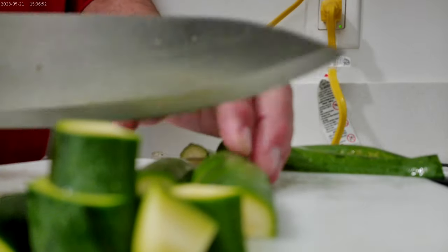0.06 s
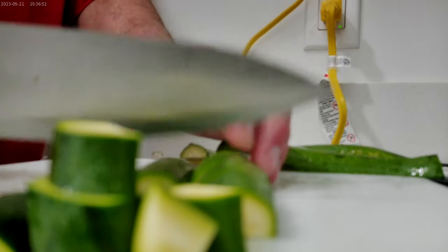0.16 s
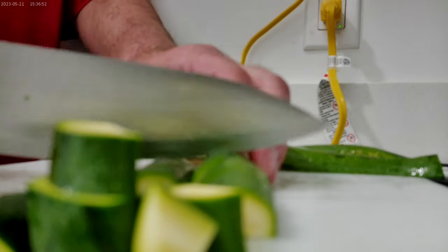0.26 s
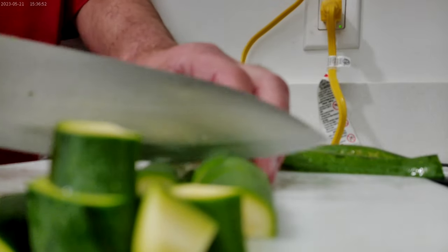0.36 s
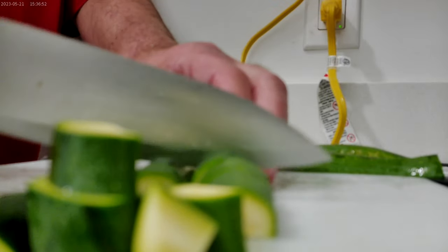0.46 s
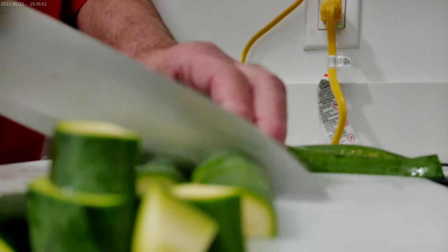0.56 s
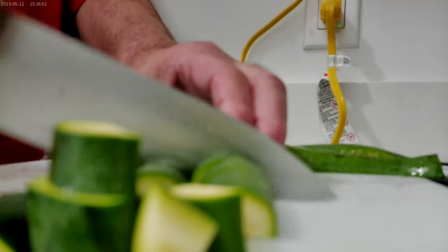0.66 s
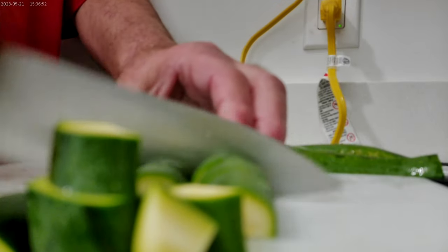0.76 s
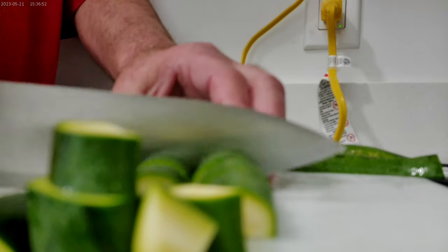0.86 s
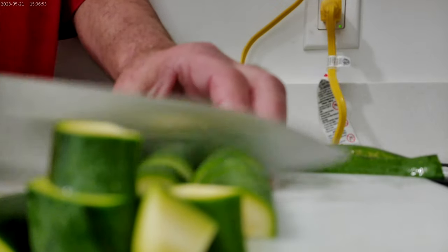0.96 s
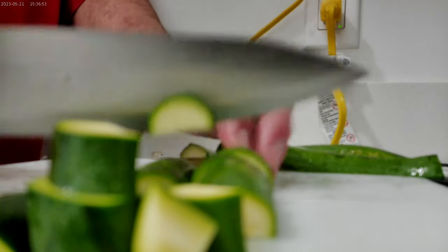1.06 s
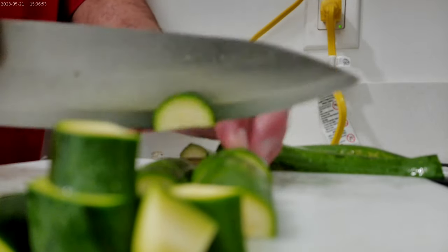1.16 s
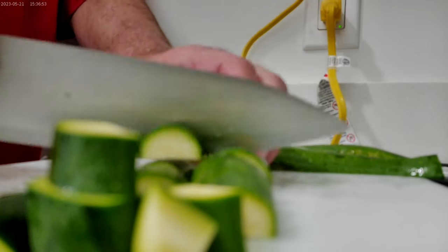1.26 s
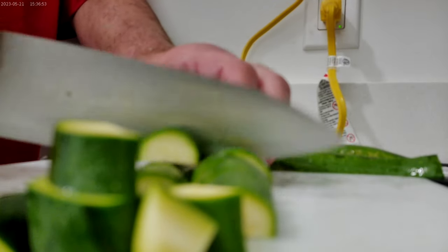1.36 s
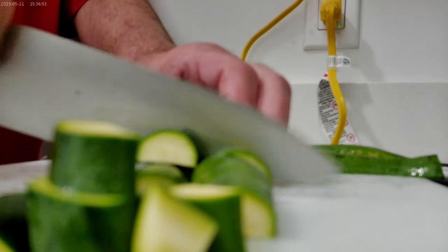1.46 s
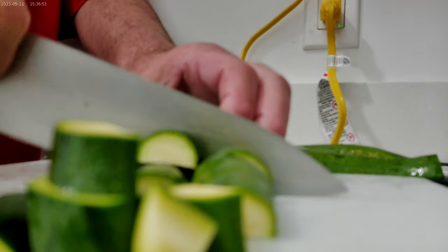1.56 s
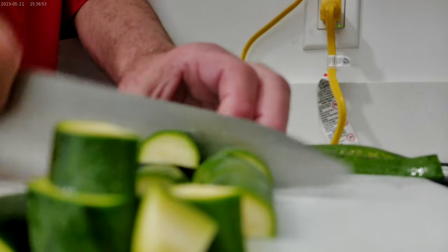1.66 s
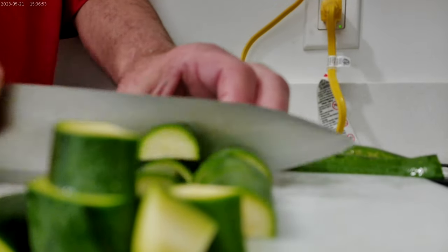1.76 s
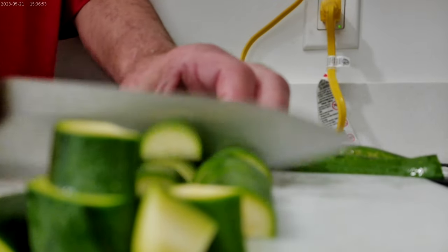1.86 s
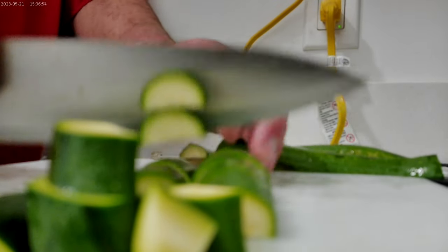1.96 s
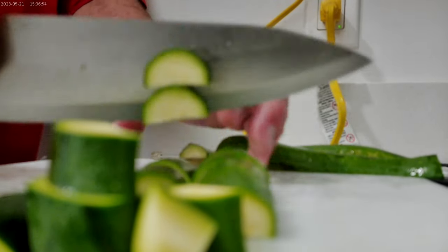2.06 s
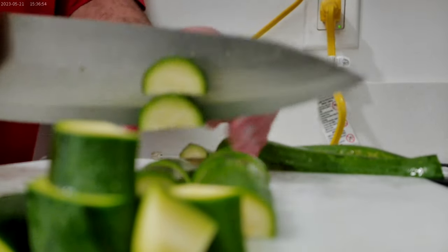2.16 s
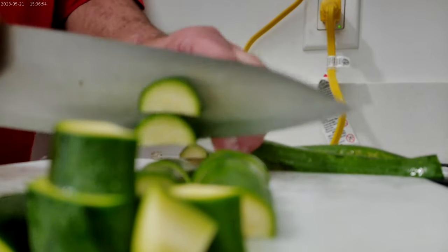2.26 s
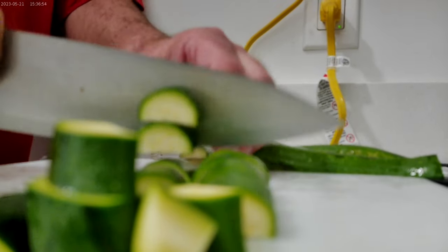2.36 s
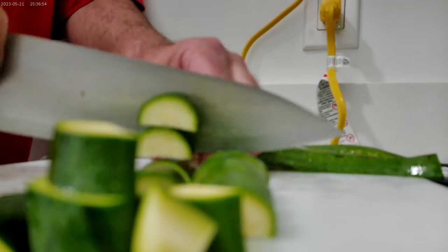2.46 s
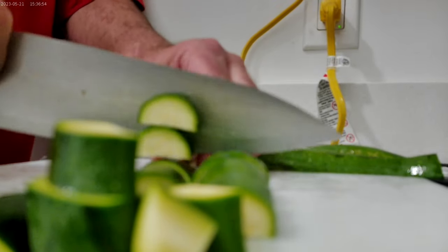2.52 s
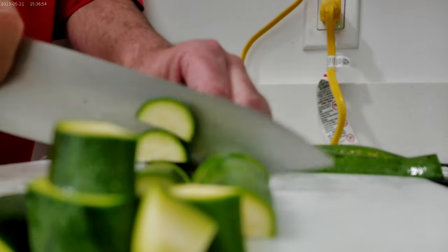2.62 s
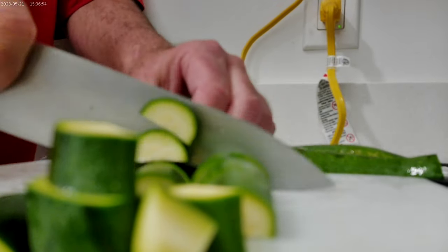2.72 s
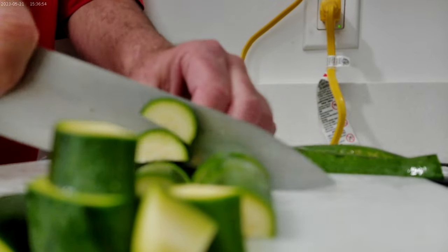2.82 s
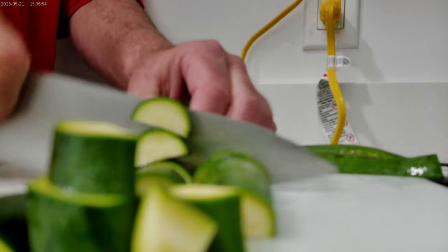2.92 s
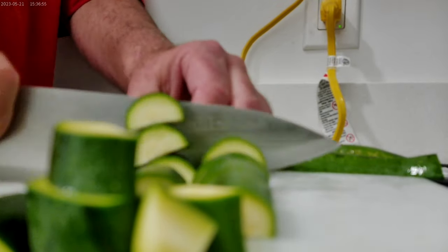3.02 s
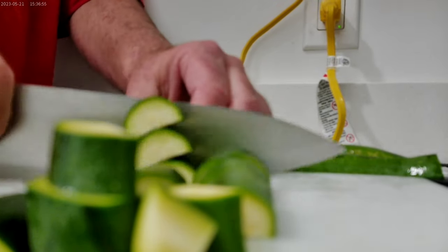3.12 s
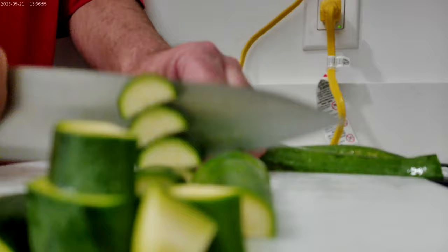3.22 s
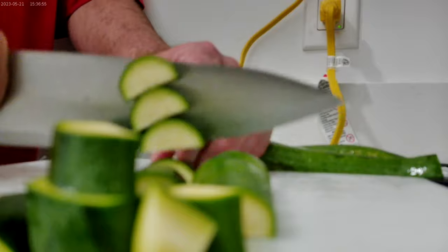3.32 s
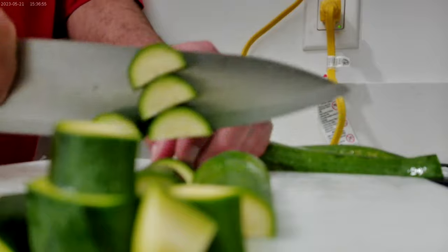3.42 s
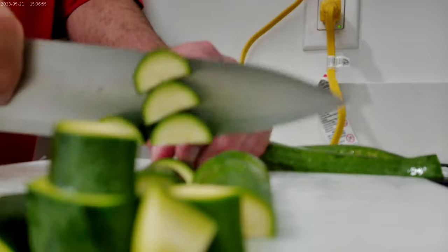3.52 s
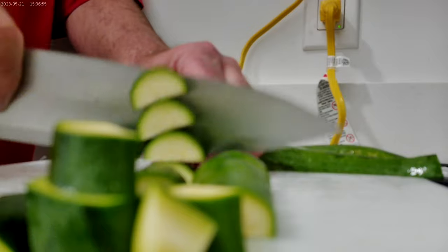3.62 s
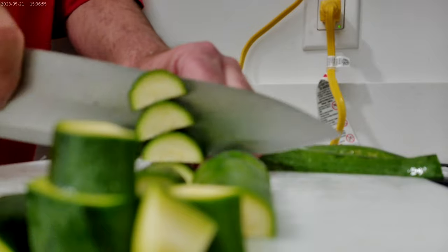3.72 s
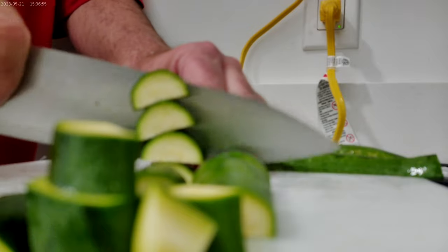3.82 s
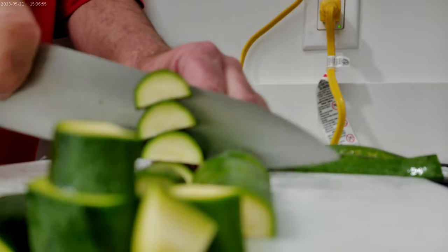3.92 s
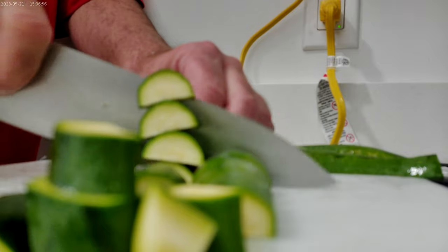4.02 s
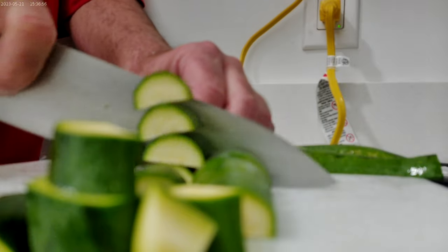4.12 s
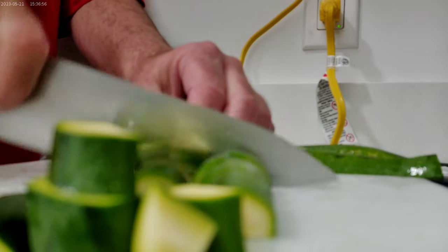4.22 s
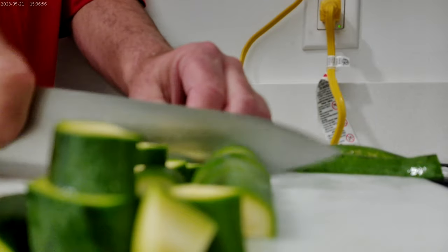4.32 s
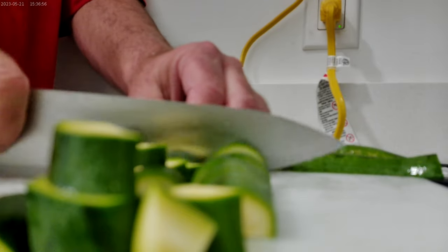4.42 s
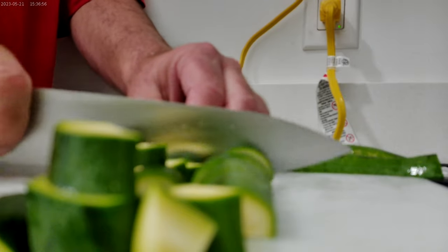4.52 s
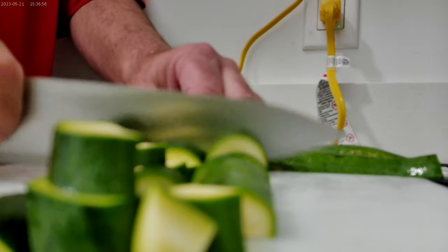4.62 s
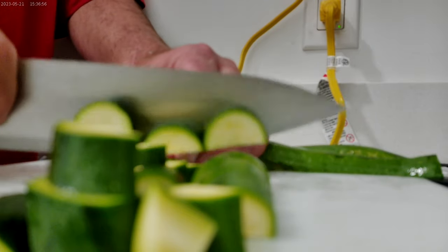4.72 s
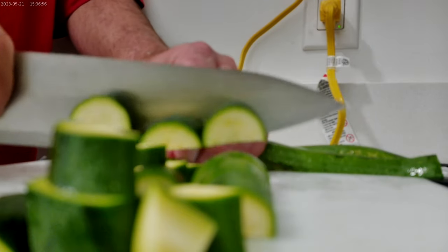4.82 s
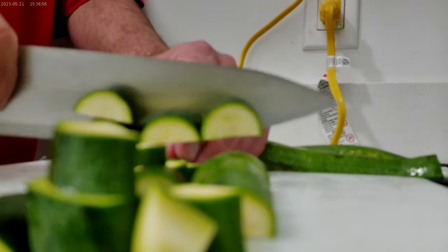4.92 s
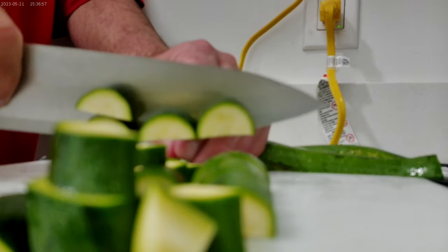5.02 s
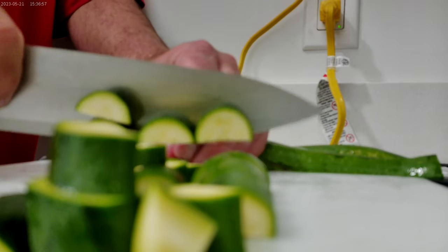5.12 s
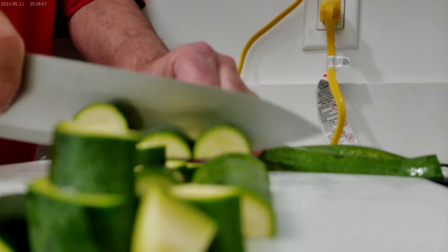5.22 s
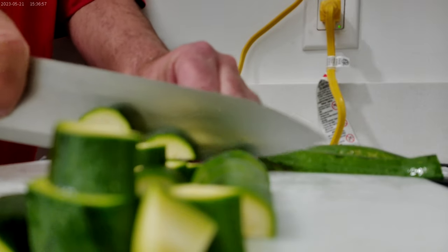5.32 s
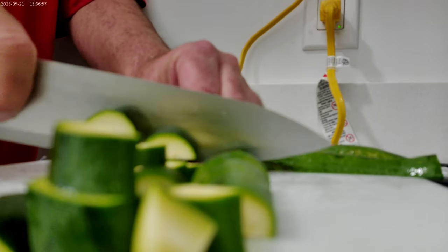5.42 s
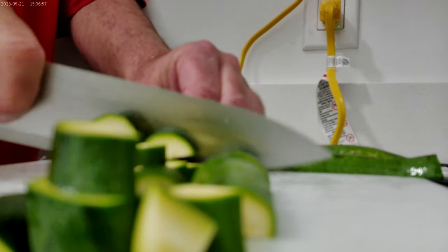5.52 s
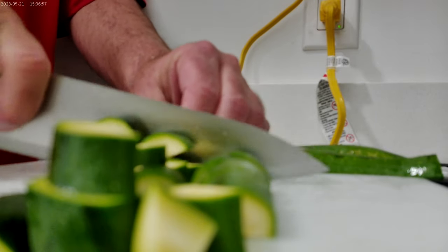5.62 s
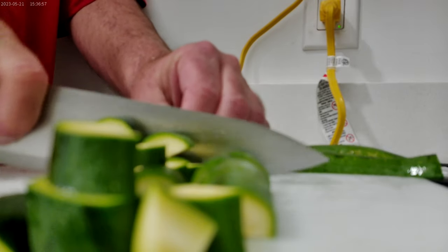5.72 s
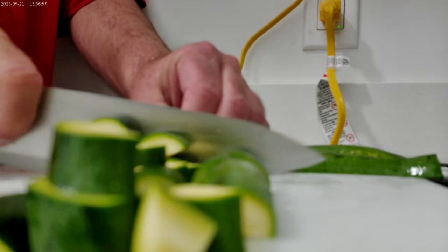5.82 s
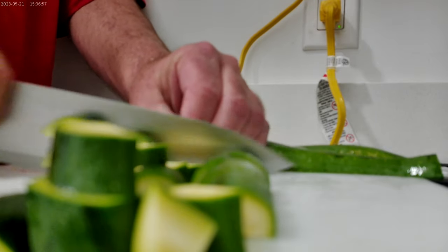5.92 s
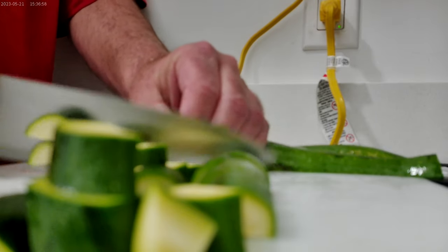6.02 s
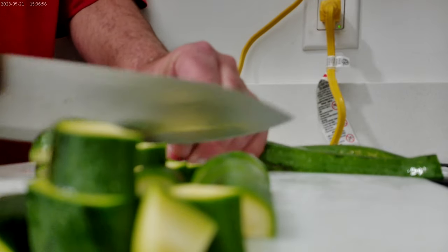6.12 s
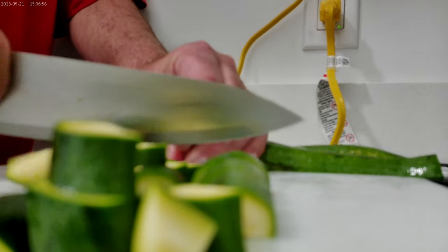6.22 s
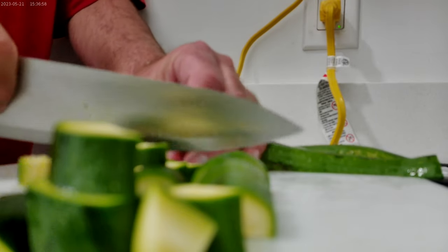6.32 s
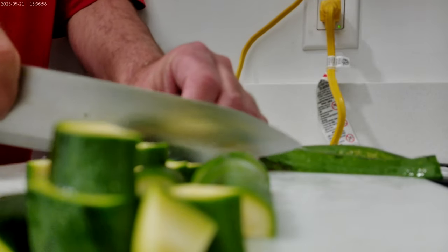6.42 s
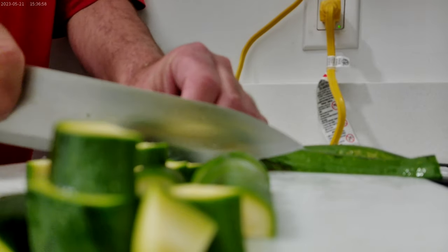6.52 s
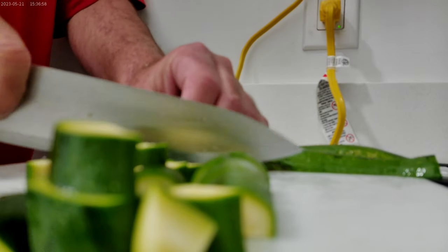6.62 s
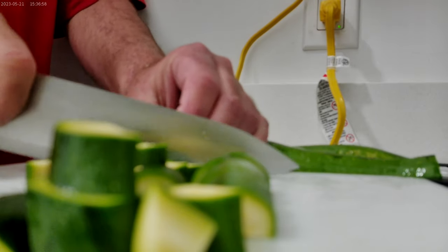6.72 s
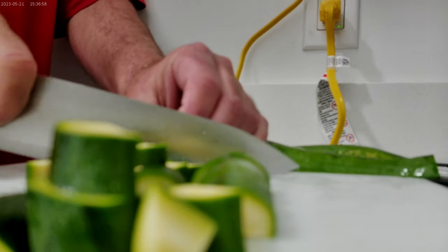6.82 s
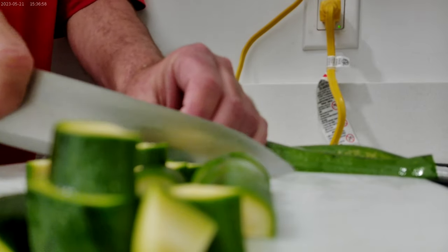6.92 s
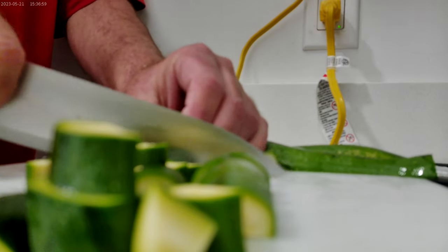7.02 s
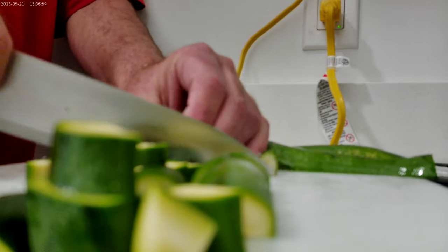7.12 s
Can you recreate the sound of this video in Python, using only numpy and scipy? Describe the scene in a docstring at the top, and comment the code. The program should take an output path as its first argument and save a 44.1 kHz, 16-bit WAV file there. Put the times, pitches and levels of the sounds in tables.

```python
"""A small kitchen, a microphone close to the cutting board: a large knife slices zucchini.
Six cuts crunch through the flesh as rough noise growing with depth; each ends in a knock of ringing board modes.
After five of them the blade is drawn back: rubbing noise and a chattering blade resonance.
Short damped modes make the soft touches of blade and slices in between; rubbing noise makes light slides.
Decaying noise gives the room, the knocks overload the microphone, and an appliance hums faintly (sines)."""
import sys
import numpy as np
from scipy import signal
from scipy.fft import rfft, irfft, next_fast_len
from scipy.io import wavfile

SR = 44100
rng = np.random.default_rng(int(sys.argv[2]) if len(sys.argv) > 2 else 0)


def dump(signal):
    """Clip the signal to [-1, 1] and save it as 16-bit WAV at the path in sys.argv[1]."""
    limited = np.clip(np.atleast_2d(signal).T, -1, 1)
    pcm = np.round(limited * 32767).astype(np.int16)
    wavfile.write(sys.argv[1], SR, pcm)


N = 316197
TIME = np.arange(N) / SR
RING_TIME = np.arange(SR // 3) / SR  # time axis of one short sound, s
THUD_T60 = 0.15  # s
GRIP_S = 0.008  # time for the blade to take hold or let go


def amp(db):
    """Decibels to gain."""
    return 10 ** (np.asarray(db) / 20)


def fall(seconds, t60):
    """Exponential decay that loses 60 dB in t60 seconds."""
    return np.exp(-np.log(1000) * seconds / t60)


def unit(x):
    """Scales to an rms of 1."""
    return x / np.sqrt(np.mean(x ** 2) + 1e-20)


def read(points, hz):
    """Reads a table on a log-frequency axis."""
    f, value = np.transpose(points)
    return np.interp(np.log(hz + 1), np.log(f + 1), value)


def add(mix, s, sound):
    """Mixes a sound in at time s."""
    part = mix[max(round(s * SR), 0):][:len(sound)]
    part += sound[:len(part)]


def colour(x, points, size=4096):
    """Causal minimum-phase filter with the given spectrum."""
    log_gain = np.log(amp(read(points, abs(np.fft.fftfreq(size, 1 / SR)))))
    minimum_phase = np.exp(np.conj(signal.hilbert(log_gain)))
    impulse = np.fft.ifft(minimum_phase).real
    return signal.oaconvolve(x, impulse[:size // 2])[:len(x)]


def resonate(x, hz, width):
    """A resonance with a gain of 1 at its peak."""
    return signal.lfilter(*signal.iirpeak(hz, hz / width, SR), x)


def ring(modes, weights):
    """Dying sines, each mode weighted by how the blow excites it."""
    hz, db, t60 = np.transpose(modes)[:, :, None]
    sines = np.sin(2 * np.pi * hz * RING_TIME)
    return (weights[:, None] * amp(db) * fall(RING_TIME, t60) * sines).sum(0)


def puff(points, t60):
    """A coloured burst of noise that starts at about rms 1 and dies away."""
    decay = fall(RING_TIME, t60)
    burst = colour(rng.standard_normal(len(decay)) * decay, points)
    return unit(burst) * np.sqrt(np.mean(decay ** 2))


def soften(x, seconds):
    """A contact of finite length rounds off the treble."""
    r = np.exp(-2 * np.pi / (SR * max(seconds, 1e-5)))
    return signal.lfilter([(1 - r) ** 2], [1, -2 * r, r * r], x)


def radiate(x, hz):
    """A small object gives off little bass."""
    return signal.sosfilt(signal.butter(3, hz, "high", fs=SR, output="sos"), x)


def muffle(x, hz):
    """Moist flesh soaks up the treble."""
    return signal.sosfilt(signal.butter(4, hz, fs=SR, output="sos"), x)


def touching(start, stop):
    """1 while the blade is in contact, with a short ramp at each end."""
    return np.clip(np.minimum(TIME - start, stop - TIME) / GRIP_S + 1 / 2, 0, 1)


# The edge hits the board: [t/s, force level/dB, contact time/ms, place along the board 0-1,
# knock centre f/Hz, level sent to the room/dB before the room's own level, counter thump level/dB]
CHOPS = [(0.7886, 0.5, 0.46, .30, 610, -5, -31), (1.6985, 2.5, 0.18, 0.3, 514, -2, -36),
         (2.9315, 2.5, 0.65, 0.76, 843, -5.5, -51.5), (4.2175, -2, 0.55, 0.3, 702.5, -7, -52.5),
         (5.7801, 3.5, 0.15, .68, 617, -5.5, -34), (6.9303, -1, 0.27, .8, 945.3, -3.5, -31)]
# Board with the knife on it: [f/Hz, relative level/dB, t60/s]
BOARD_MODES = [(330, -7.5, 0.038), (460, -12.5, 0.043), (535.9, -1, 0.024), (666, -5, 0.018),
               (712, -6.5, 0.026), (789, 3, 0.037), (947, -5, 0.034), (1123, -2.5, .02), (1250, -7, 0.021),
               (1517, -7, 0.044), (1990, -14, 0.017)]
# Crowd of weaker, tightly packed board modes, a spectrum: [f/Hz, relative level/dB]
BOARD_CROWD = [(150, -30.5), (280, -4), (600, 3), (950, -3), (1250, -2.5), (1600, -11.5), (2000, -14),
               (2600, -30), (3300, -26), (4300, -31), (6200, -39.5), (7500, -65)]
# Low thud of the counter, a spectrum: [f/Hz, relative level/dB]
THUD = [(15, -26.5), (30, -11), (55, -1.5), (85, -2), (125, -3), (190, -9), (300, -13), (500, -31.5),
        (1200, -71)]
# Wall and counter throw the knock back: [delay t/s, level/dB]
ECHOES = [(.0029, -9), (.0068, -23.5), (.0098, -18)]


def chops():
    """The tip lands, then the whole edge, and the board rings; returns the near sound and the room's feed."""
    near, far = np.zeros((2, N))
    lag = 0.0017  # s from tip to whole edge
    shape_db, focus_db, octaves = 2.5, 4, 0.45
    tip_db, crowd_db, steel_db = -10, -7, -53
    crowd_t60, steel_t60 = 0.04, 0.14  # s
    bass_hz, steel_hz = 235, 5570
    mode_hz = np.transpose(BOARD_MODES)[0]
    order = np.arange(len(BOARD_MODES)) + 1

    # the blade gives a faint, blurred ping
    ping = rng.standard_normal(len(RING_TIME))
    ping = resonate(resonate(ping, steel_hz, 300), steel_hz, 300)
    steel = amp(steel_db) * fall(RING_TIME, steel_t60) * unit(ping)

    for s, db, contact_ms, place, centre_hz, room_db, thump_db in CHOPS:
        # each mode is strong or weak according to where the edge lands
        weights_db = shape_db * np.cos(2 * np.pi * order * place)
        distance = np.log2(mode_hz / centre_hz) / octaves
        weights_db += focus_db * np.exp(-distance ** 2) - focus_db / 2
        modes = soften(ring(BOARD_MODES, amp(weights_db)), contact_ms / 1000)
        crowd = amp(crowd_db) * puff(BOARD_CROWD, crowd_t60)
        knock = amp(db) * radiate(modes + crowd, bass_hz)
        thump = amp(thump_db) * puff(THUD, THUD_T60)
        add(near, s, -amp(tip_db) * knock + thump + steel)
        add(near, s + lag, -knock)
        add(far, s + lag, amp(room_db) * knock + thump)
        for delay, echo_db in ECHOES:
            add(near, s + lag + delay, -amp(echo_db) * knock)
    return near, far


# The edge passes through the flesh, one row before each chop:
# [skin gives way t/s, crunch level/dB, rasp level/dB, growth on the way down/dB];
# levels are at full depth, before the snap of the bottom skin
CUTS = [(0.713, -39.5, -58.5, 11), (1.533, -41.5, -64.5, 15), (2.76, -41.5, -66.5, 5.5),
        (4.039, -38, -66, 16.5), (5.69, -29, -52, 32.5), (6.857, -41.5, -60.5, 9)]
# Wet hiss of the flesh as it parts, a spectrum: [f/Hz, relative level/dB]
FLESH = [(900, -26.5), (1750, 3.5), (2200, -3.5), (2700, -4.5), (3150, -2.5), (3500, -5.5), (4000, 1),
         (4600, -11.5), (5300, -19.5), (5900, -13), (6600, -28), (7500, -40)]


def cuts():
    """The crunch grows with the depth of the edge and ends when it meets the board."""
    crunch, rasp = np.zeros((2, N))
    rasp_growth = 1.45  # the rasp grows faster than the crunch
    snap_db, snap_s = 13, 0.011  # both surge as the bottom skin snaps
    for (start, crunch_db, rasp_db, growth_db), (stop, *_) in zip(CUTS, CHOPS):
        left_s = np.clip(stop - TIME, 0, stop - start)
        shallow_db = growth_db * left_s / (stop - start)
        push = touching(start, stop) * amp(snap_db * np.exp(-left_s / snap_s))
        crunch += push * amp(crunch_db - shallow_db)
        rasp += push * amp(rasp_db - rasp_growth * shallow_db)
    return rubbing(crunch, rasp, FLESH, grains_per_s=1400, spread_db=2.5, smooth=0.44, jerk_db=5.0)


# The blade is drawn back over the board: [start t/s, fastest t/s, t60 after that/s, scrape level/dB,
# rasp level/dB, chatter level/dB, chatter f/Hz when fastest, its rise before that/(Hz per s)]
DRAWS = [(0.868, .988, 0.14, -36, -52.5, -36.5, 801.7, 1200), (1.759, 1.872, 0.14, -35, -54, -47, 820, 0),
         (3.063, 3.15, 0.21, -40, -57.5, -39.5, 710, -300),
         (4.394, 4.493, 0.13, -36.5, -54.5, -32.5, 744, -400), (6.049, 6.149, 0.31, -55, -71, -61, 844, 0)]
# Hiss of the edge, a spectrum: [f/Hz, relative level/dB]
EDGE_HISS = [(900, -31), (1900, -0.5), (2500, -1.5), (3150, -2), (4000, -0.5), (4500, -9.5), (5300, -10),
             (5800, -7), (6400, -18.5), (7500, -34.5)]


def draws():
    """Each draw swells as the blade speeds up, then dies away as it lifts off the board."""
    scrape, rasp, judder = np.zeros((3, N))
    # as the blade gathers speed the scrape swells a little and the rasp a lot
    scrape_db_per_s, rasp_db_per_s = 20, 94.5
    bite_s = 0.025  # time for the edge to start rasping on the board
    for start, fastest, release_s, scrape_db, rasp_db, chatter_db, chatter_hz, rise in DRAWS:
        early_s = np.maximum(fastest - TIME, 0)
        late_s = np.maximum(TIME - fastest, 0)
        contact = touching(start, fastest + release_s) * fall(late_s, release_s)
        swell = contact * amp(-scrape_db_per_s * early_s)
        scrape += swell * amp(scrape_db)
        bite = np.clip((TIME - start) / bite_s, 0, 1)
        rasp += bite * contact * amp(rasp_db - rasp_db_per_s * early_s)
        judder += swell * amp(chatter_db) * chatter(chatter_hz - rise * early_s)
    return judder + rubbing(scrape, rasp, EDGE_HISS, grains_per_s=1600, spread_db=3.5, smooth=0.32, jerk_db=3.5)


def chatter(hz, width_hz=60):
    """Stick and slip keep one resonance of the blade going, with an uneven pitch and strength."""
    r = np.exp(-2 * np.pi * width_hz / SR)
    noise = rng.standard_normal(N) + 1j * rng.standard_normal(N)
    swing = signal.lfilter([1], [1, -2 * r, r * r], noise)
    swing /= np.hypot(abs(swing), swing.std())  # friction limits each swing
    carrier = np.exp(2j * np.pi * np.cumsum(hz) / SR)
    return unit((swing * carrier).real)


# Resonances of the blade while it rubs: [f/Hz, width f/Hz, relative level/dB]
BLADE_MODES = [(345, 150, -7), (627, 140, -5), (790, 74, 2.5), (1020, 410, -12.5), (1620, 220, -15.5)]


def rubbing(body_gain, rasp_gain, hiss, grains_per_s, spread_db, smooth, jerk_db, jerks_per_s=70):
    """Tiny snaps and slips, coming in jerks, shake the blade and hiss at its edge."""
    sizes = amp(spread_db * np.minimum(rng.exponential(1, N), 4)) * rng.choice([-1, 1], N)
    grains = unit(sizes * (rng.random(N) < grains_per_s / SR))
    drive = grains + smooth * rng.standard_normal(N)
    jerks = np.interp(TIME * jerks_per_s, np.arange(N), rng.uniform(-1, 1, N))
    drive *= amp(jerk_db * jerks)
    body = np.zeros(N)
    for k, (hz, width, db) in enumerate(BLADE_MODES):
        body += (-1) ** k * amp(db) * resonate(drive, hz, width)  # neighbours swing in opposite senses
    return body_gain * unit(muffle(body, hz=2120)) + rasp_gain * unit(colour(drive, hiss))


# Light touches of the blade, snaps of the skin and falling slices, levels before the trims in taps():
# [t/s, knock level/dB, centre f/Hz, board level/dB, thud level/dB, tick level/dB,
# settling time/ms (at least 1 is used)]
TAPS = [(0.044, -35, 880, -70, -32, -72, 2.1), (0.117, -40, 930, -60, -41.5, -82, 0.52),
        (0.445, -79, 385, -64, -44, -100, 3.6), (0.547, -35.5, 730, -51, -51.5, -70, 5.3),
        (0.858, -35, 850, -62, -64.5, -50, 1.3), (0.883, -31, 700, -53.5, -57, -62, 2),
        (1.044, -24, 834, -45.5, -34, -55.5, 1.7), (1.066, -33, 790, -46, -39, -72, 2.5),
        (1.121, -28, 720, -43, -55, -70, 5.5), (1.219, -23.5, 800, -67, -73.5, -70.5, 1.9),
        (1.436, -47.5, 495, -45, -35, -100, 1.08), (1.655, -38.5, 800, -50, -60.5, -52.5, 9.8),
        (1.681, -27, 790, -46, -52.5, -49.5, 2.5), (1.923, -17.5, 830, -33.5, -24.5, -30, 1.21),
        (1.945, -25, 813, -42, -40, -91.5, 1.53), (2.163, -46, 650, -55.5, -62, -105, 1.8),
        (2.780, -26.5, 772, -39.5, -45, -55.5, 2.2), (2.836, -34.5, 765, -52, -59.5, -69.5, 2),
        (2.912, -41, 790, -48, -63, -47.5, 0.96), (3.115, -24.5, 800, -58.5, -46.5, -40.5, 1.57),
        (3.217, -36, 840, -48.5, -37, -76.5, 1.24), (3.332, -24, 660, -34, -39, -75.5, 2),
        (3.474, -47, 809, -61.5, -58.5, -98, 1.7), (4.035, -28, 838, -46.5, -49, -64, 5.6),
        (4.141, -30, 775, -48, -53.5, -62.5, 3.9), (4.396, -33, 757, -45, -45, -78, 2.5),
        (4.477, -24, 756, -43.5, -34, -51, 1.8), (5.483, -59, 450, -58, -49.5, -93, 4),
        (5.521, -31, 540, -47, -43.5, -90.5, 5.4), (5.738, -28.5, 804, -52.5, -55.5, -66, 3),
        (6.437, -40.5, 699, -51.5, -42.5, -99, 4.1), (6.523, -43, 710, -63, -48, -94, 3.6),
        (7.104, -25.5, 789, -55, -54, -86, 2.4)]
# What a touch rings with: [f/Hz, relative level/dB, t60/s]
TOUCH_MODES = [(420, -17.5, 0.053), (605, -2.5, 0.026), (720, -1, 0.039), (847, -1, .033),
               (1040, -11, .025), (1640, -6, .014)]


def taps():
    """Soft, moist contacts that settle over milliseconds: a knock, the board's lowest note, a thud and a tick."""
    out = np.zeros(N)
    knock_trim_db, thud_trim_db, tick_trim_db = -0.5, -3, -1
    focus_db = 4  # loss one octave from the centre
    contact_s = 0.00092
    reach = 2.7  # treble limit of the knock, as a multiple of its centre
    mode_hz = np.transpose(TOUCH_MODES)[0]
    signs = (-1.) ** np.arange(len(TOUCH_MODES))  # neighbouring modes swing in opposite senses
    board_mode = [(305, 8, 0.065)]  # f/Hz, level/dB, t60/s
    board = soften(ring(board_mode, np.ones(1)), contact_s)
    for s, db, centre_hz, note_db, thud_db, tick_db, settle_ms in TAPS:
        u = RING_TIME * 1000 / max(settle_ms, 1)
        press = u * np.exp(1 - u)
        # the first touch, then many smaller ones as the flesh flattens
        force = rng.standard_normal(len(u)) * press
        force /= np.linalg.norm(force)
        force[0] += 1
        modes = ring(TOUCH_MODES, signs * amp(-focus_db * np.log2(mode_hz / centre_hz) ** 2))
        knock = signal.fftconvolve(force, modes)[:len(u)]
        knock = muffle(soften(knock, contact_s), reach * centre_hz)
        thud = puff(THUD, THUD_T60)
        tick = press * unit(colour(rng.standard_normal(len(u)), FLESH))
        add(out, s - .001, amp(db + knock_trim_db) * knock / abs(knock).max())
        add(out, s, amp(note_db) * board)
        add(out, s, amp(thud_db + thud_trim_db) * thud)
        add(out, s, amp(tick_db + tick_trim_db) * tick)
    return out


# Blade and slices slide softly over the skin: [start t/s, t60/s, level/dB]
SLIDES = [(0, .2, -49.5), (.13, .4, -61), (.57, .9, -63.5), (5.548, .5, -62), (6.322, .6, -70),
          (6.54, .5, -63)]


def slides():
    """Light rubbing that fades as the blade settles for the next cut."""
    rub = np.zeros(N)
    for start, fade_s, db in SLIDES:
        rub += touching(start, start + fade_s) * amp(db) * fall(abs(TIME - start), fade_s)
    rasp = rub * amp(-28.5)  # wet skin hardly hisses
    return rubbing(rub, rasp, FLESH, grains_per_s=700, spread_db=3.5, smooth=.3, jerk_db=3.5)


# Colour of the kitchen's reverberation: [f/Hz, relative level/dB]
ROOM_COLOUR = [(60, -5.5), (115, 13), (190, -19.5), (320, -4), (450, -10.5), (600, 2.5), (760, -2),
               (1050, 3), (1350, -1), (1700, -5.5), (2400, -15.5), (4000, -14), (8000, -17.5)]
# Its decay: [f/Hz, t60/s]
ROOM_T60 = [(100, 0.5), (400, 0.27), (1000, 0.37), (2800, 0.37), (7000, 0.54)]


def room_tail(onset=0.019, build=0.0057):
    """Dense reflections, each band dying at its own speed; they start and build up in the given seconds."""
    hz, t, bands = signal.stft(rng.standard_normal(SR), SR, nperseg=512)
    bands = bands * fall(t, read(ROOM_T60, hz)[:, None])
    tail = signal.istft(bands, SR, nperseg=512)[1][:SR]
    tail = tail * np.clip((TIME[:SR] - onset) / build, 0, 1)
    return colour(tail / np.linalg.norm(tail), ROOM_COLOUR)


def kitchen(x):
    """One room colour and decay throughout; each stroke gets a freshly drawn tail of dense reflections."""
    stroke_starts = [row[0] - .3 for row in CHOPS[1:]]  # 0.3 s before each later knock
    stroke = np.searchsorted(stroke_starts, TIME)
    out = np.zeros(N)
    for k in range(len(CHOPS)):
        add(out, TIME[stroke == k][0], signal.fftconvolve(x[stroke == k], room_tail()))
    return out


# Appliance hum: [f/Hz, rms level/dB]
HUM = [(54, -76), (118.5, -70), (238, -92), (299, -82.5)]
# Spectrum of the rumble under it: [f/Hz, relative level/dB]
RUMBLE = [(15, -18), (32, -7.5), (52, -0.5), (90, -4.5), (125, -2), (165, -17.5), (240, -13.5), (330, -16),
          (410, -33), (600, -34.5), (900, -50), (1600, -56), (9000, -60)]


def background(rumble_db=-65):
    """A low rumble of coloured noise with a faint hum of steady sines."""
    hum = np.zeros(N)
    for hz, db in HUM:
        hum += amp(db) * np.sqrt(2) * np.sin(2 * np.pi * (hz * TIME + rng.random()))
    return hum + amp(rumble_db) * unit(colour(rng.standard_normal(N), RUMBLE))


def scene(chop_room_db=-9, small_room_db=-20):
    """Knocks, cuts, scrapes and touches in the kitchen."""
    near, far = chops()
    small = cuts() + draws() + slides() + taps()
    room = kitchen(amp(chop_room_db) * far + amp(small_room_db) * small)
    return (near + small + room + background())[None]


# Colour of the microphone, with a lean upper bass and a treble roll-off: [f/Hz, level/dB]
MICROPHONE = [(70, 0), (130, -3), (190, -6), (290, 0), (6300, 0), (7200, -2), (8000, -10), (9000, -26)]


def record(dry, ceiling=0.67, edge_hz=9000):
    """The input clips on the knocks; then the treble rolls off to the band limit."""
    x = signal.resample_poly(dry[0], 2, 1) / ceiling  # clipped at twice the rate against aliasing
    clipped = ceiling * signal.resample_poly(x / (1 + x ** 8) ** (1 / 8), 1, 2)
    size = 2 * next_fast_len(N)
    gain = amp(read(MICROPHONE, np.fft.rfftfreq(size, 1 / SR)))
    dull = irfft(rfft(clipped, size) * gain)[:N]
    band_limit = signal.firwin(511, edge_hz, window=("kaiser", 9), fs=SR)
    return signal.oaconvolve(dull, band_limit, "same")[None]


dry = scene()
out = record(dry)
dump(out)
```